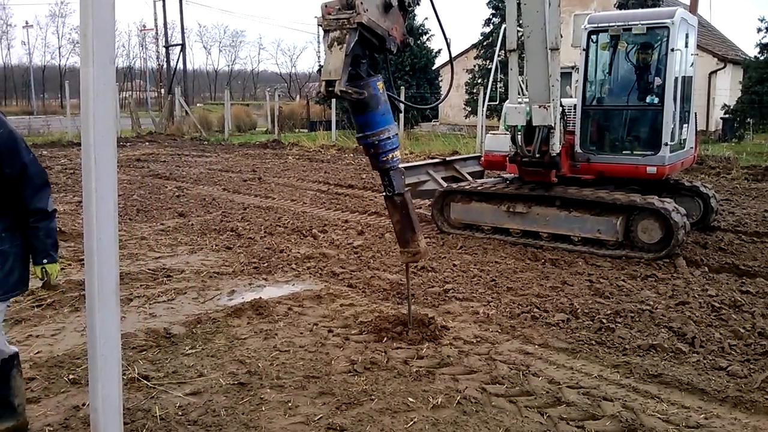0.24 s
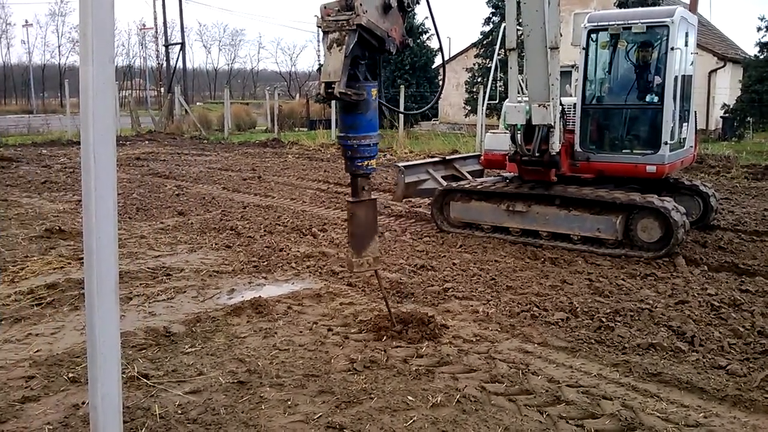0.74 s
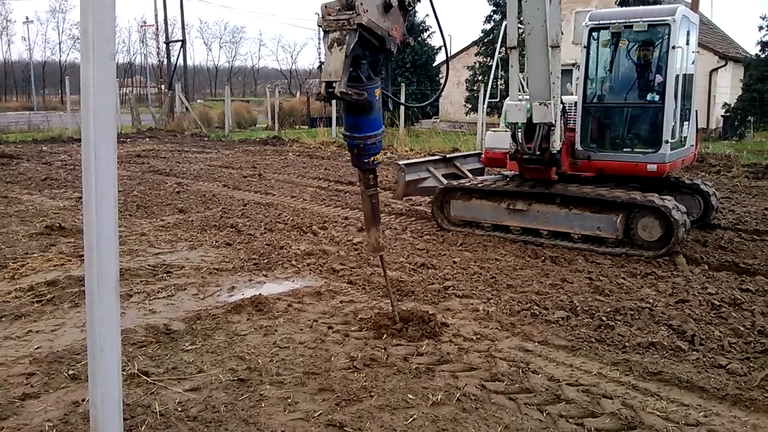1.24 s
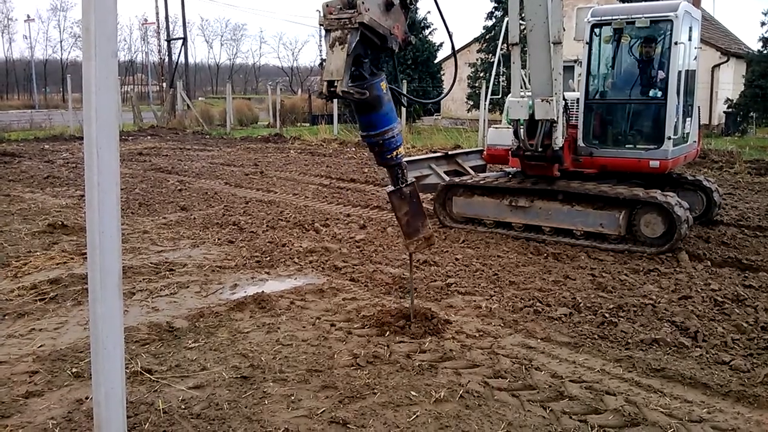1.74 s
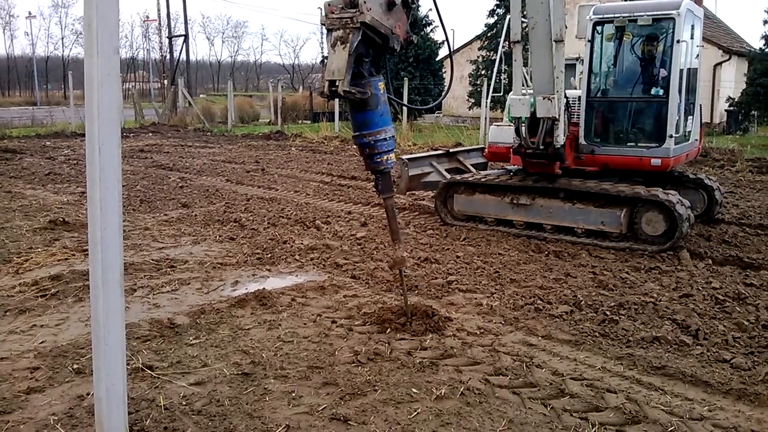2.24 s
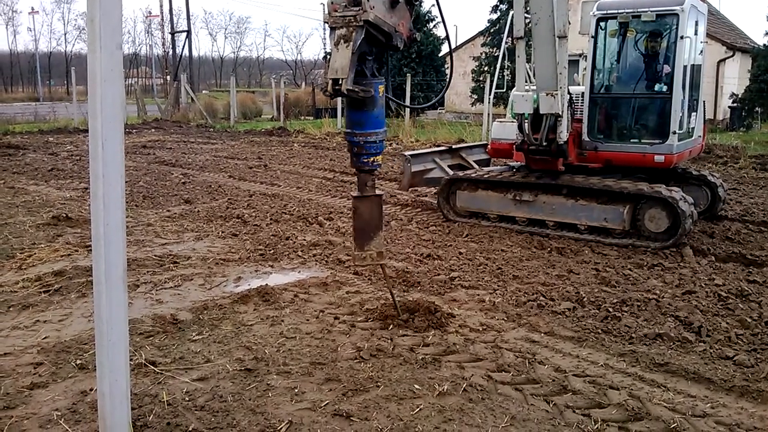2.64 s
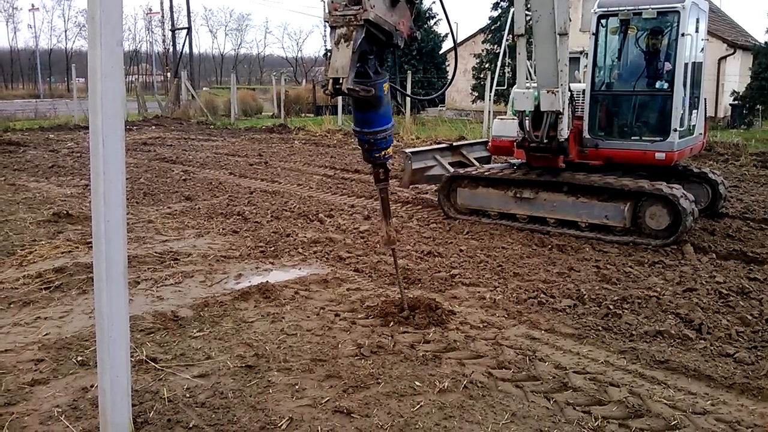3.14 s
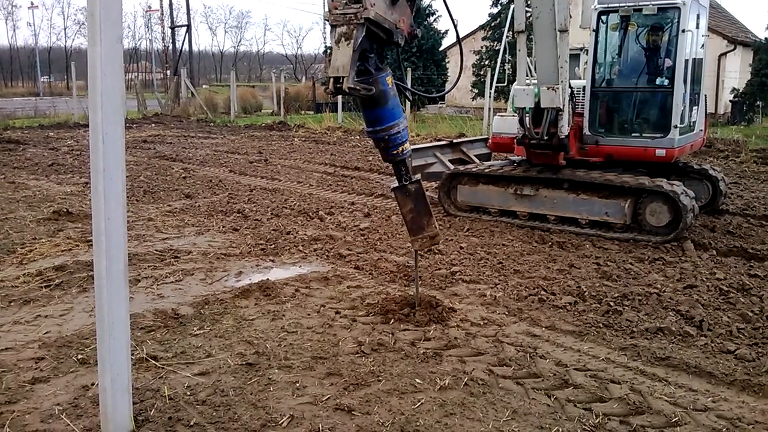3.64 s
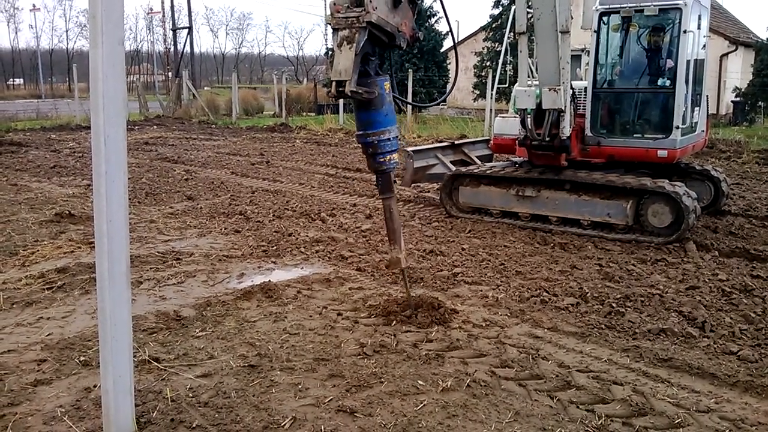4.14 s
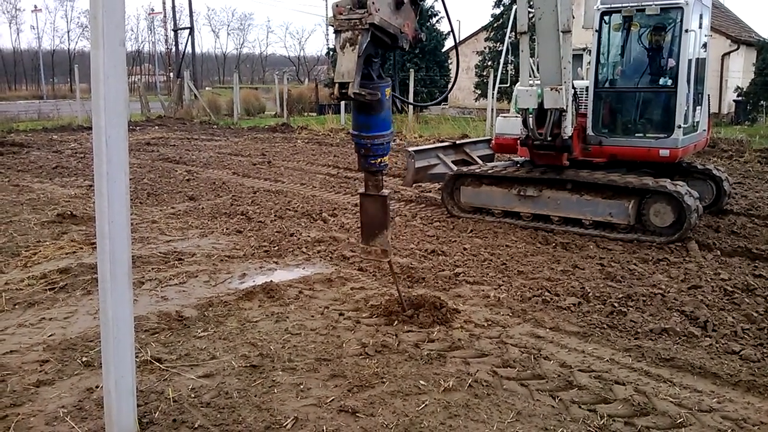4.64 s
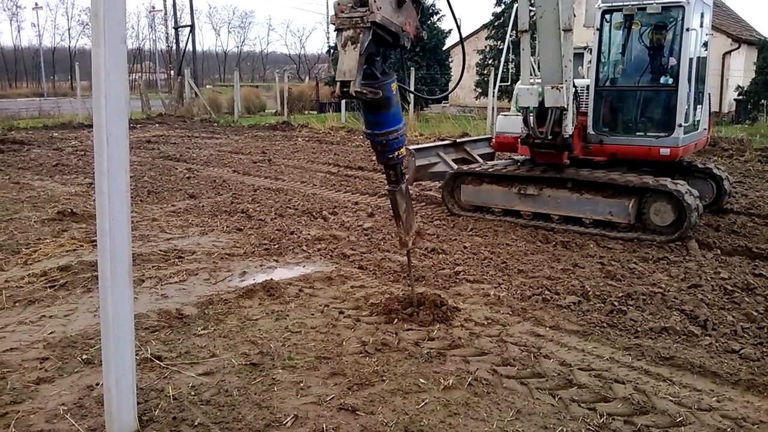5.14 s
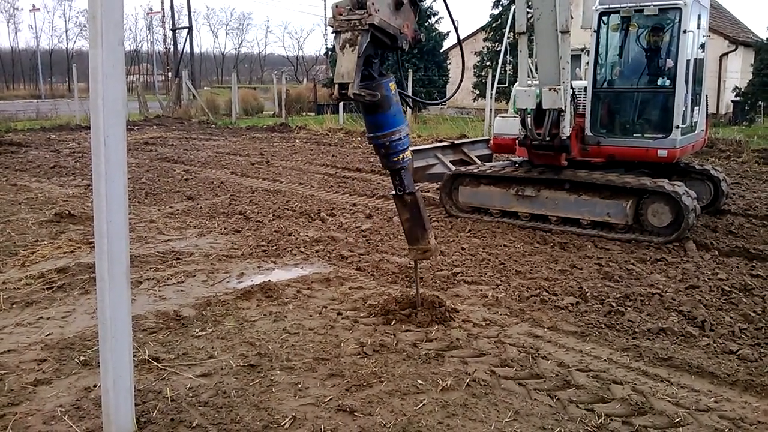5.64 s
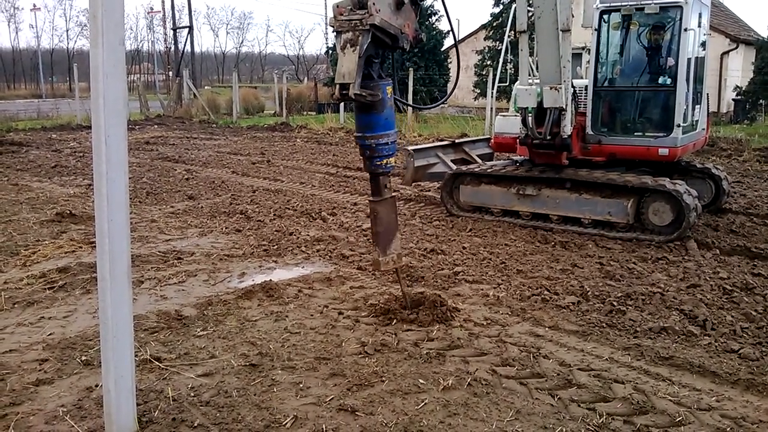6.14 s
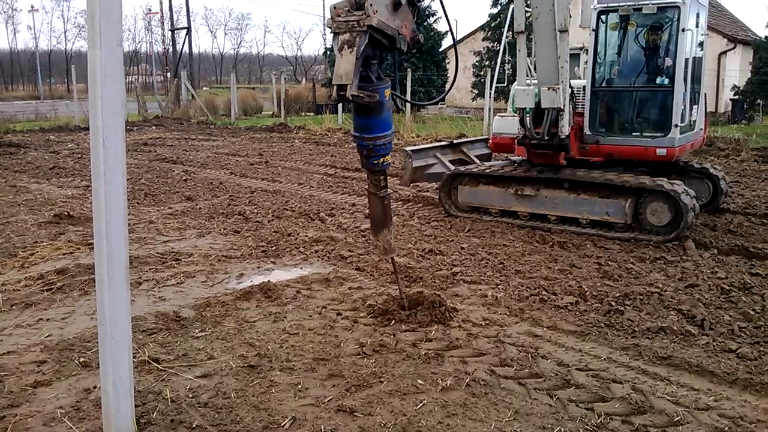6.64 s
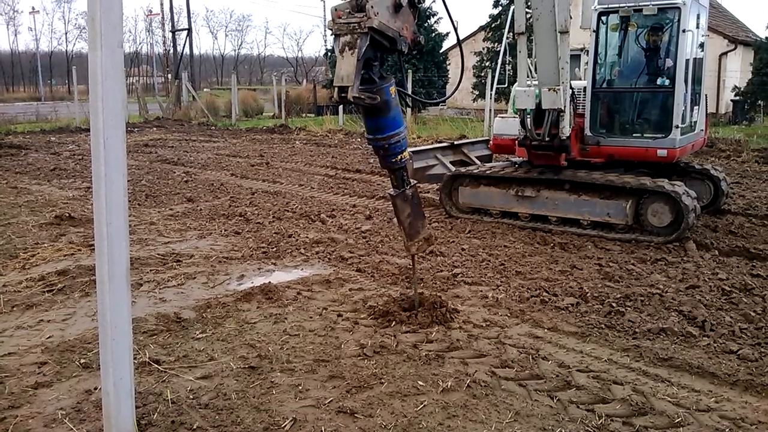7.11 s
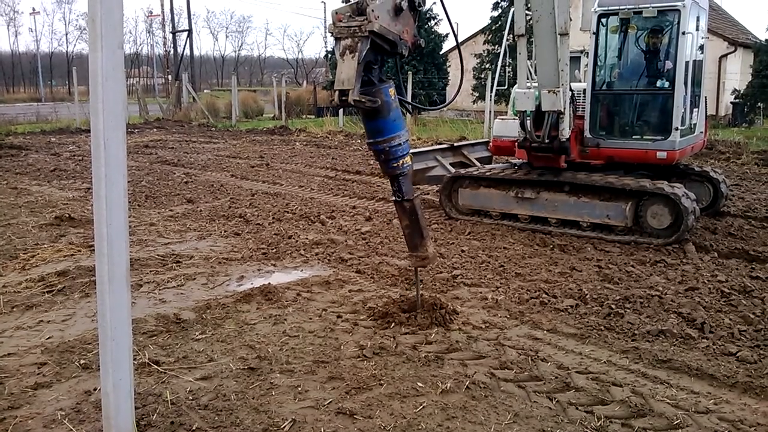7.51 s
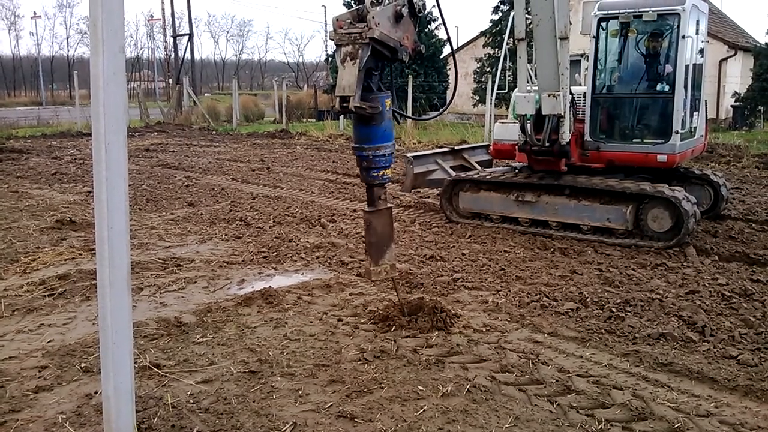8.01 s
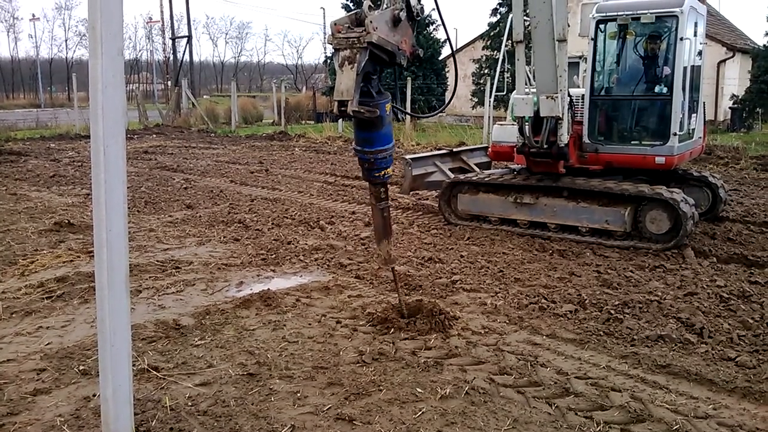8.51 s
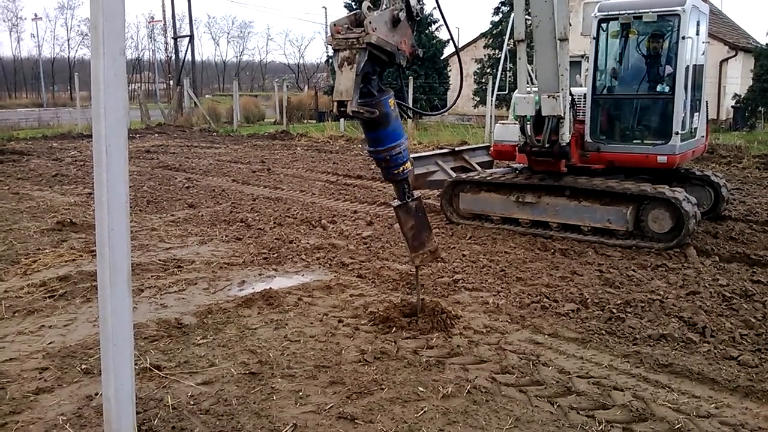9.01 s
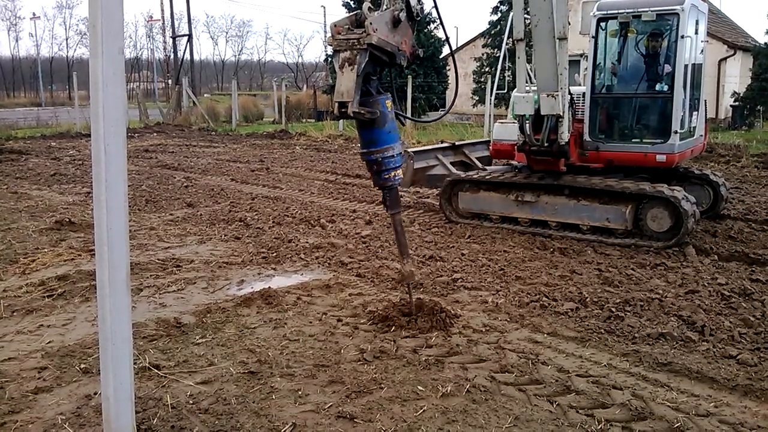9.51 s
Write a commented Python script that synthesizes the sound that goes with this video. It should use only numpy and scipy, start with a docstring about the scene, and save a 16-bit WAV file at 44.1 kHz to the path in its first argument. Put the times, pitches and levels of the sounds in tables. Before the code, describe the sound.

A diesel excavator drones low and evenly outdoors, with soft knocking and clatter. Its hydraulic auger adds a faint high hiss in rapid pulses, swelling about every two seconds. The first two seconds are broken by clicks and six short silences. Later, wind gusts rumble and thump on the microphone; near seven seconds come more clicks, another dropout and a tiny steel ping. Mono, dry, open field.

```python
"""A diesel excavator drones at steady speed in a field throughout; oil hisses in quick pulses through its auger
motor. In the first two seconds the drone jumps with sharp clicks and the sound drops out six times. The hiss,
swelling once a turn of the auger, is strongest near 3 s; pump, fan and belt hum, and a gear whines. From about
6 s gusts crowd in over a rising breeze and eddies thump the microphone. Near 7 s come more clicks, the seventh
dropout and a steel ping. Engine and pump are sines plus shaped noise, the oil resonant noise, the wind low
noise."""
import sys
import numpy as np
from scipy import signal
from scipy.fft import rfft, irfft, next_fast_len
from scipy.io import wavfile
from scipy.ndimage import map_coordinates

SR = 44100
rng = np.random.default_rng(int(sys.argv[2]) if len(sys.argv) > 2 else 0)


def dump(signal):
    """Clip the signal to [-1, 1] and save it as 16-bit WAV at the path in sys.argv[1]."""
    limited = np.clip(np.atleast_2d(signal).T, -1, 1)
    pcm = np.round(limited * 32767).astype(np.int16)
    wavfile.write(sys.argv[1], SR, pcm)


N = 430857

FIRING_HZ = 58.37
# engine tones: multiple of firing rate, rms level/dB
ENGINE_ORDERS = [(.25, -64.5), (.75, -53), (1, -26), (2, -44.5), (3, -53.5), (4, -64.5), (5, -69),
                 (6, -63.5), (10.5, -61.5), (11, -71), (11.75, -68), (12.5, -69.5), (16, -69.5), (20, -72),
                 (33, -78), (50, -73.5)]
# common level of casing, clatter and cover, before their offsets: t/s, level/dB
ENGINE_EFFORT = [(2.6, -51.5), (6.5, -50.5), (8.2, -51.5), (9.1, -53), (9.77, -51)]
# noise spectra, relative: f/Hz, level/dB
EXHAUST_SPECTRUM = [(15, -31.5), (28, -8), (45, 2), (90, -0.5), (170, 1.5), (215, -15), (260, -7.5),
                    (310, -21.5), (500, -38), (1000, -71)]
CASING_SPECTRUM = [(150, -23), (300, -12), (450, -5), (520, 1.5), (570, -3), (630, 2), (760, -2),
                   (830, -11), (1000, -9), (1300, -27), (2500, -66)]
CLATTER_SPECTRUM = [(500, -15.5), (950, 1.5), (1330, -1), (1750, -0.5), (2100, 1), (2600, -4), (3700, -4),
                    (4500, -12.5), (6200, -16), (9000, -17.5), (11000, -30), (13000, -48.5)]
WIND_SPECTRUM = [(12, -33.5), (28, -6), (55, 0.5), (100, -2.5), (160, -9), (230, -14), (330, -22),
                 (600, -40.5), (1500, -81.5)]
# resonances of the engine cover: f/Hz, width/Hz, relative level/dB
COVER_MODES = [(1510, 81, 0.5), (1600, 80, -1.5)]

# clicks where the beat jumps: t/s, nominal step/dB
BEAT_SKIPS = [(0.0594, -16), (0.0993, -17.5), (0.2595, -19), (0.2908, -21), (0.3096, -19), (0.4796, -20),
              (0.5296, -17.5), (0.6401, -19.5), (0.7996, -16.5), (0.8496, -18.5), (0.9084, -23),
              (0.9294, -21), (0.9895, -19.5), (1.0999, -20), (1.2992, -17.5), (1.3291, -17.5),
              (1.4495, -19.5), (1.6898, -19.5), (1.7293, -19), (1.8595, -19), (5.3599, -17.5),
              (6.9499, -26), (7.01, -16.5), (7.0301, -22), (7.159, -25), (7.1901, -17.5), (7.2289, -22),
              (7.3702, -19)]
# dropouts: start t/s, end t/s
DROPOUTS = [(0.1426, 0.2524), (0.3222, 0.4721), (0.6811, 0.7811), (1.1292, 1.2994), (1.4853, 1.5851),
            (1.9102, 2.0106), (7.2352, 7.3547)]
# faint skips: random lead before a dropout, up to LEAD_MAX_S; beat jump of each
LEAD_MAX_S, SLIP_FIRINGS = 0.14, 0.1

# oil pulse rate of the auger motor: t/s, rate/Hz
OIL_PULSE_RATE = [(0, 18.45), (2, 17.78), (4, 17.76), (5, 17.88), (5.5, 18.08), (6.2, 17.8), (7.1, 18.25),
                  (7.8, 17.95), (9, 17.8), (9.77, 17.7)]
# oil-line resonances, auger turning freely / biting: f/Hz, width/Hz, relative level/dB
FREE_MODES = [(3030, 24, -3.5), (5450, 50, -6.5), (6680, 70, 2), (7030, 110, -3), (7240, 60, 5),
              (7700, 280, -8), (7840, 90, 1), (8690, 80, 0), (9150, 100, -11), (9720, 64, -16.5),
              (9940, 50, -13), (10430, 100, -17)]
BITING_MODES = [(4700, 50, -9.5), (6760, 140, -4.5), (6840, 57, -10.5), (7055, 100, -0.5),
                (7380, 100, -1.5), (7600, 190, 0), (7970, 66, -5.5), (8070, 90, -12.5), (8570, 200, -10),
                (8770, 81, -12), (9170, 100, -12), (9720, 90, -17), (10420, 90, -20)]
# relief valve whistle: f/Hz, width/Hz, relative level/dB
RELIEF_MODES = [(3475, 40, 0)]
PULSES_PER_TURN = 32.44
BITE_PEAK_S = 1.46  # one peak of the bite; the others lie whole turns away
HISS_DB, BITE_DB = -56.0, 2.5  # hiss in the firmest soil; swing either way over a turn
FIRMEST_S, EASE_DB_PER_S = 3.0, 0.4  # firmest soil; fall of the hiss before and after

# tapped steel: t/s, initial amplitude/dB, f/Hz, t60/s
STEEL_PINGS = [(7.371, -42, 1170, 0.18)]
# pump, fan and belt tones: f/Hz, mean level/dB
PUMP_TONES = [(263.8, -55.5), (290.7, -65), (356, -63.5), (373.6, -60), (527.6, -56), (622.8, -59.5),
              (731, -63.5), (1168, -72), (3978, -75.5)]
# gear whine: t/s, mean level/dB
WHINE_LEVEL = [(3.5, -77), (4.5, -66), (6.2, -65.5), (6.9, -61.5), (8.6, -60.5), (8.9, -70)]

BREEZE_DB, BREEZE_RISE_DB_PER_S = -51.5, 0.86  # level at 0 s; rise
# gusts: t/s, peak level/dB, 1/e time each side/s
WIND_GUSTS = [(2.18, -31, 0.046), (2.42, -36, .07), (5.08, -35, .1), (6.27, -35, 0.052),
              (6.83, -29.5, 0.18), (7.21, -28.5, 0.021), (7.41, -32.5, 0.092), (7.63, -33, 0.071),
              (8.1, -31.5, 0.14), (8.9, -28.5, 0.32), (9.35, -32, 0.12), (9.66, -23, 0.087)]
# single eddies on the microphone: t/s, peak level/dB, half-width/s
EDDIES = [(2.172, -23, 0.0019), (6.843, -22, 0.0014), (7.215, -15.5, 0.0013), (8.125, -26, 0.0011),
          (8.741, -16, 0.0024), (8.92, -24, 0.0011), (9.6215, -19.5, 0.00093), (9.659, -13.5, 0.00096)]
TOP_HZ = 16200


def amp(db):
    """Decibels to gain."""
    return 10 ** (np.asarray(db) / 20)


def unit(x):
    """Scale to rms 1."""
    return x / np.sqrt(np.mean(x ** 2) + 1e-20)


def clock():
    """Time of every sample, s."""
    return np.arange(N) / SR


def curves(rows):
    """One value per sample for each column after the time."""
    s, *cols = np.transpose(rows)
    return [np.interp(clock(), s, c) for c in cols]


def wobble(rate_hz):
    """Smooth random curve with rate_hz knots a second."""
    knots = rng.standard_normal(4096)
    coarse = clock()[::32]
    smooth = map_coordinates(knots, [coarse * rate_hz], mode="wrap")
    return np.interp(clock(), coarse, smooth)


def filtered(x, response):
    """x through a complex frequency response."""
    m = next_fast_len(N + SR // 2)
    return irfft(rfft(x, m) * response(np.fft.rfftfreq(m, 1 / SR)), m)[:N]


def coloured(x, spectrum):
    """x shaped by a spectrum, interpolated over log f, at rms 1."""
    hz, db = np.transpose(spectrum)
    return unit(filtered(x, lambda f: amp(np.interp(np.log(f + 1), np.log(hz), db))))


def resonate(x, modes):
    """x through parallel bandpass resonances of alternating sign, at rms 1."""
    def response(f):
        total = 0
        for k, (hz, width, db) in enumerate(modes):
            band = 1j * f * width / (hz * hz - f * f + 1j * f * width)
            total = total + (-1) ** k * amp(db) * band
        return total
    return unit(filtered(x, response))


def sine(turns):
    """Tone of rms 1 from its phase in turns."""
    return np.sqrt(2) * np.sin(2 * np.pi * turns)


def engine(beat):
    """Exhaust drones on the firing rate; casing knocks, injection clatters, a cover buzzes at a wavering level."""
    effort_db, = curves(ENGINE_EFFORT)
    drone = 0
    for order, db in ENGINE_ORDERS:
        level = amp(db + 0.15 * wobble(6.8))
        drone = drone + level * sine(order * (beat + 0.0023 * wobble(13)))

    exhaust_noise = knocks(beat, repeat=0.037, throb=0.48)
    exhaust = amp(-42.5) * coloured(exhaust_noise, EXHAUST_SPECTRUM)

    casing_level = amp(effort_db + 3 + 0.73 * wobble(26))
    casing = casing_level * coloured(knocks(beat, repeat=0.3, throb=0.22), CASING_SPECTRUM)

    clatter_level = amp(effort_db - 0.66 + 0.64 * wobble(25))
    injection = panels(knocks(beat, repeat=0.18, throb=0.16))
    clatter = clatter_level * coloured(injection, CLATTER_SPECTRUM)

    cover_level = amp(effort_db - 7.5 + 2.2 * wobble(4))
    cover = cover_level * resonate(knocks(beat, repeat=0.067, throb=0.18), COVER_MODES)
    return drone + exhaust + casing + clatter + cover


def firings(full_step_db=-17.0, faint_per_dropout=3):
    """Running firing count; loud skips jump across a zero of the drone, faint ones nudge it: the step clicks."""
    leads_s = rng.uniform(0, LEAD_MAX_S, (len(DROPOUTS), faint_per_dropout))
    faint = [(start - lead, None) for (start, _), row in zip(DROPOUTS, leads_s) for lead in row]
    times, counts = [0], [0]
    for s, db in sorted(BEAT_SKIPS + faint, key=lambda skip: skip[0]):
        due = counts[-1] + FIRING_HZ * (s - times[-1])
        if db is None:
            counts += [due, due + SLIP_FIRINGS]
        else:
            zero = np.round(2 * due) / 2
            # steps cannot exceed the full swing of the drone
            swing = min(1, amp(db - full_step_db))
            reach = np.sign(due - zero) * np.arcsin(swing) / (2 * np.pi)
            counts += [zero + reach, zero - reach]
        sample = round(s * SR)
        times += [sample / SR, (sample + 1) / SR]
    offset = np.array(counts) - FIRING_HZ * np.array(times)
    return FIRING_HZ * clock() + np.interp(clock(), times, offset)


def knocks(beat, repeat, throb):
    """Noise swelling at each firing; a share of its power recurs every round of the four cylinders."""
    count = round(4 * SR / FIRING_HZ)
    place = np.round(beat / 4 * count).astype(int) % count
    pattern = rng.standard_normal(count)[place]
    share = np.clip(repeat, 0, 1)
    noise = np.sqrt(share) * pattern + np.sqrt(1 - share) * rng.standard_normal(N)
    return noise * (1 + throb * np.cos(2 * np.pi * beat))


def panels(x, ring=0.44, t60_s=0.12):
    """Sheet-steel covers add a dense, short ring: decaying noise convolved with x."""
    t = np.arange(SR // 8) / SR
    tail = rng.standard_normal(len(t)) * amp(-60 * t / t60_s)
    return x + ring * signal.fftconvolve(x, tail / np.linalg.norm(tail))[:N]


def auger(pulse_db=4.5, ripple_db=1.9, free_db=-60, biting_db=-55.5, whistle_db=-9, edge_hz=11000):
    """Oil hisses in pulses as the motor turns, each with a ripple from its seven chambers."""
    rate_hz, = curves(OIL_PULSE_RATE)
    pulse_count = np.cumsum(rate_hz) / SR
    hiss_db = digging(pulse_count)
    chamber = 7 * pulse_count
    pulses = pulse_db * (np.cos(2 * np.pi * pulse_count) + 0.13 * np.cos(4 * np.pi * pulse_count))
    ripple = ripple_db * (np.cos(2 * np.pi * chamber) + np.cos(4 * np.pi * chamber))
    envelope = amp(pulses + ripple + 0.76 * wobble(18))
    free, biting, relief = envelope * rng.standard_normal((3, N))
    # pressure rises with the bite: other resonances take over, the relief valve whistles
    strain = np.clip((hiss_db - free_db) / (biting_db - free_db), 0, 1)
    unloaded = resonate(free, FREE_MODES)
    loaded = resonate(biting, BITING_MODES) + amp(whistle_db) * resonate(relief, RELIEF_MODES)
    hiss = amp(hiss_db) * (np.sqrt(1 - strain) * unloaded + np.sqrt(strain) * loaded)
    # the hiss fades out steeply above edge_hz
    return filtered(hiss, lambda hz: 1 / (1 + (hz / edge_hz) ** 20))


def digging(pulse_count):
    """Oil hiss level, dB: swells once a turn as the bit bites, strongest in the firmest soil."""
    peak_count = np.interp(BITE_PEAK_S, clock(), pulse_count)
    turns = (pulse_count - peak_count) / PULSES_PER_TURN
    bite = BITE_DB * np.cos(2 * np.pi * turns)
    return HISS_DB + bite - EASE_DB_PER_S * np.abs(clock() - FIRMEST_S)


def pump():
    """Wavering sines of pump, fan and belt, and the thin whine of a gear on the crankshaft."""
    hum = 0
    for hz, db in PUMP_TONES:
        level = amp(db + 2.6 * wobble(7))
        turns = hz * clock() + 0.16 * wobble(5) + hz / 7000 * wobble(50)
        hum = hum + level * sine(turns)
    whine_db, = curves(WHINE_LEVEL)
    teeth = 35 * FIRING_HZ * clock() + 0.12 * wobble(4)
    return hum + amp(whine_db + 1.2 * wobble(9)) * sine(teeth)


def ping():
    """A steel part of the auger mount is tapped: a briefly decaying sine."""
    out = np.zeros(N)
    for s, db, hz, t60_s in STEEL_PINGS:
        t = np.maximum(clock() - s, 0)
        out += amp(db - 60 * t / t60_s) * np.sin(2 * np.pi * hz * t)
    return out


def wind(flutter_db=2.0, gust_tilt_db_per_octave=0.6):
    """Breeze and brighter gusts flutter on the microphone as low noise; single eddies thump as short pulses."""
    breeze = amp(BREEZE_DB + BREEZE_RISE_DB_PER_S * clock())
    swells = [amp(db) * np.exp(-np.abs(clock() - s) / fall_s) for s, db, fall_s in WIND_GUSTS]
    gusts = np.linalg.norm(swells, axis=0)
    brighter = [(hz, db + gust_tilt_db_per_octave * np.log2(hz)) for hz, db in WIND_SPECTRUM]
    flutter = unit(amp(flutter_db * wobble(60)))
    breeze_noise = breeze * coloured(rng.standard_normal(N), WIND_SPECTRUM)
    gust_noise = gusts * coloured(rng.standard_normal(N), brighter)
    out = flutter * (breeze_noise + gust_noise)
    for s, db, width_s in EDDIES:
        u = (clock() - s) / width_s
        out += amp(db) * (1 - u ** 2) * np.exp(-u ** 2 / 2)
    return out


def scene():
    """The machine and the wind in the open field, one channel."""
    return (engine(firings()) + auger() + pump() + ping() + wind())[None]


def record(dry):
    """Silence the dropouts, then cut everything from the band limit up."""
    live = np.ones(N)
    for start, end in DROPOUTS:
        live[round(start * SR):round(end * SR)] = 0
    return filtered(dry[0] * live, lambda hz: hz < TOP_HZ)[None]


dry = scene()
out = record(dry)
dump(out)
```